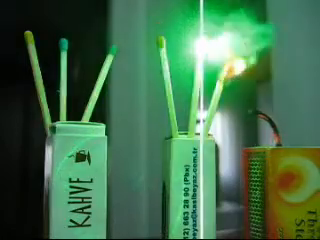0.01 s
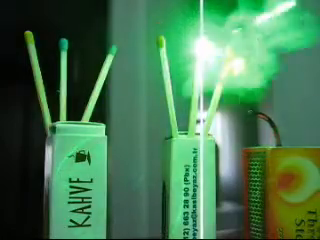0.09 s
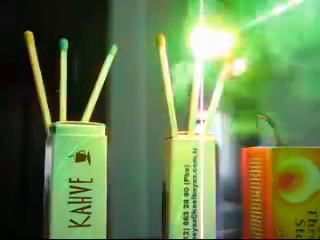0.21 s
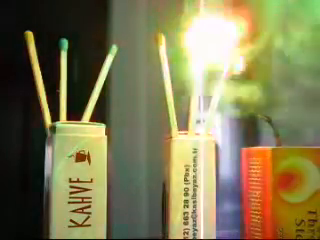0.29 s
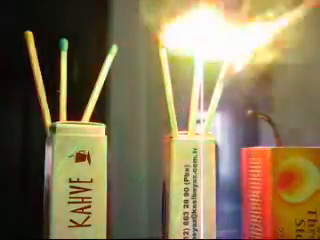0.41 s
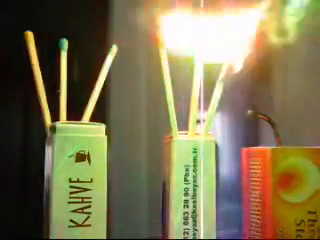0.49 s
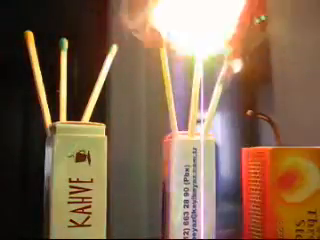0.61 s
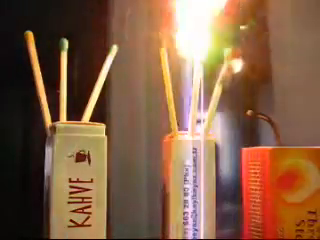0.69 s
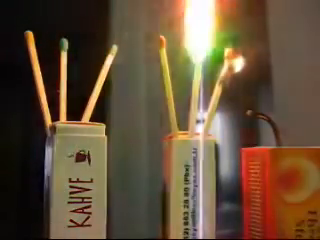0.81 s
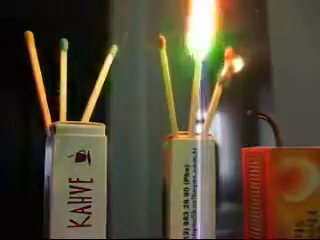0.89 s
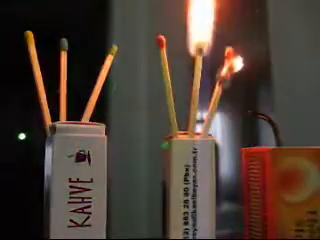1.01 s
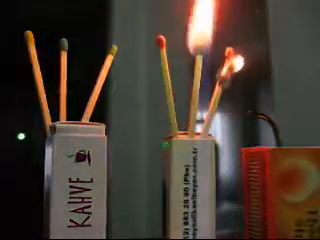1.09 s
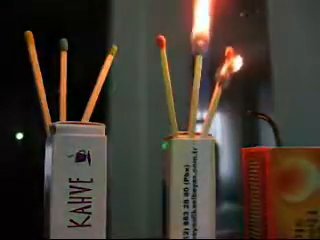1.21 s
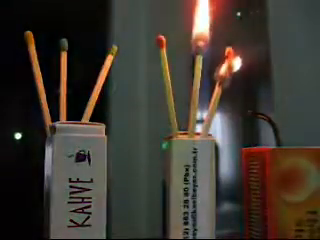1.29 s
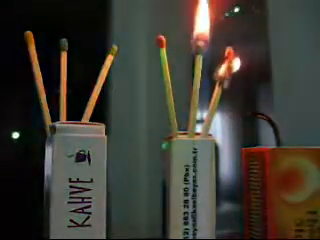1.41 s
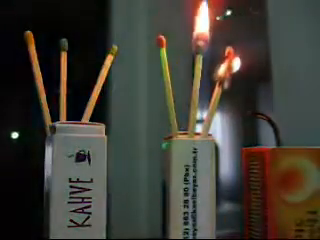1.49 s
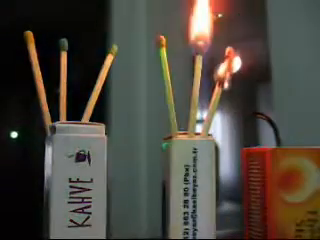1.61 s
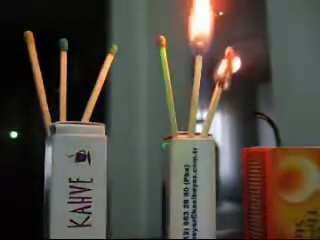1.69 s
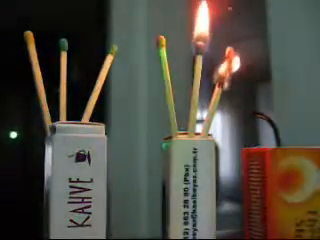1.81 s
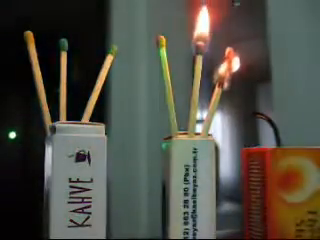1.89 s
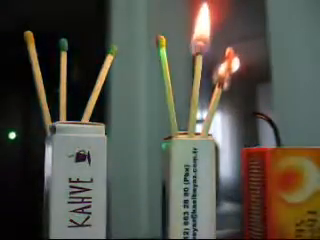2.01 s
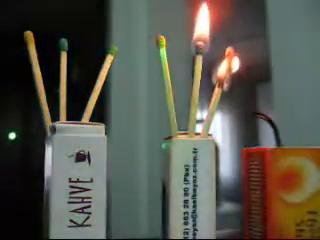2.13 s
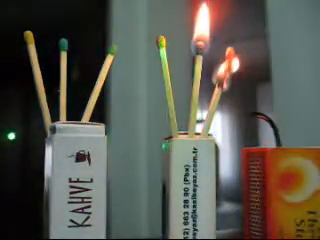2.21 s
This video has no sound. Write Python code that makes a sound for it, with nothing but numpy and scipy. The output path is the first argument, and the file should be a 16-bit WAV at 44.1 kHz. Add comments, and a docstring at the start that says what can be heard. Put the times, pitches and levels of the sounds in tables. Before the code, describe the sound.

A match head fizzes faintly, pops sharply and flares into a rough crackling hiss for under a second, then drops abruptly to a few woody ticks over low electrical hum, close microphone in a small room.

```python
"""A match head catches fire close to a microphone indoors: grain bursts and a gas jet, as shaped noise, fizz
softly, then flare for two thirds of a second and drop abruptly to a faint hiss. Decaying modes and a click
make one sharp pop as the flare starts; shaped clicks make the crackles and the burning stick's few ticks.
Low noise is the fluttering draught; wavering sines over room noise are the electrical hum and thin whine."""
import sys
import numpy as np
from scipy import signal
from scipy.fft import rfft, irfft, next_fast_len
from scipy.io import wavfile
from scipy.ndimage import map_coordinates

SR = 44100
rng = np.random.default_rng(int(sys.argv[2]) if len(sys.argv) > 2 else 0)


def store_pcm(level_fs):
    """Save levels as 16-bit WAV."""
    pcm = np.round(np.clip(level_fs, -1, 1) * 32767).astype(np.int16)
    wavfile.write(sys.argv[1], SR, np.atleast_2d(pcm).T)


N = 101430

TREBLE_HZ, TOP_HZ = 3460, 12750  # pivot of the treble tilts; band limit


def amp(db):
    """Decibels to gain."""
    return 10 ** (np.asarray(db) / 20)


def unit(x):
    """Scale to rms 1."""
    return x / np.sqrt(np.mean(x ** 2) + 1e-20)


def along(points, hz):
    """Interpolate (frequency [Hz], value) points on a log frequency axis."""
    point_hz, value = np.transpose(points)
    return np.interp(np.log(hz + 1), np.log(point_hz + 1), value)


def swell(rows):
    """Gain per sample from (time [s], level [dB]) rows, ends held."""
    time_s, level_db = np.transpose(rows)
    return amp(np.interp(np.arange(N) / SR, time_s, level_db))


def wobble(knots_per_s):
    """Smooth random curve: a spline through normal knots."""
    knots = rng.standard_normal(int(N * knots_per_s / SR) + 4)
    return map_coordinates(knots, [np.arange(N) * knots_per_s / SR])


def filtered(x, response):
    """Zero-phase filter: the spectrum of x times a gain of frequency."""
    size = next_fast_len(N + SR // 2)
    gain = response(np.fft.rfftfreq(size, 1 / SR))
    return irfft(rfft(x, size) * gain, size)[:N]


def noise(colour):
    """Gaussian noise of the given (frequency [Hz], level [dB]) colour, rms 1."""
    return unit(filtered(rng.standard_normal(N), lambda hz: amp(along(colour, hz))))


def snap(colour_db, size=2048):
    """Minimum-phase click of the given colour, peak 1, by folding the cepstrum."""
    magnitude = amp(colour_db(np.fft.rfftfreq(size, 1 / SR)))
    cepstrum = irfft(np.log(magnitude + 1e-6))
    cepstrum[1:size // 2] *= 2
    cepstrum[size // 2 + 1:] = 0
    click = irfft(np.exp(rfft(cepstrum)))
    return click / np.abs(click).max()


def add(track, start_s, sound):
    """Mix a sound into the track in place."""
    part = track[round(start_s * SR):][:len(sound)]
    part += sound[:len(part)]


def crumble(level_db, t60_s):
    """Unit impulse with fine bursts, as decaying noise, dying away after it."""
    t = np.arange(SR // 50) / SR
    bursts = amp(level_db - 60 * t / t60_s) * rng.standard_normal(len(t))
    return (t == 0) + bursts


def head_db(hz):
    """Colour of the burning head at the microphone, falling further above TOP_HZ."""
    # burning head: (frequency [Hz], level [dB])
    sizzle = [(60, -20.5), (200, -6), (480, 1.5), (630, -3.5), (800, 2), (1100, -3.5), (1400, 3),
              (1820, -3), (2300, 2.5), (2760, -5), (3200, 0), (4000, -6.5), (4450, -4.5), (5800, -5.5),
              (6700, -8.5), (7200, -11), (7900, -7), (8300, -12.5), (8750, -9), (9250, -16.5),
              (9600, -16.5), (10000, -18), (10800, -37)]
    return along(sizzle, hz) - 20 * np.clip(hz / TOP_HZ - 1, 0, 1)


def room(x, wet_db):
    """Add a small room's short answer: convolution with decaying noise of unit energy."""
    t60_s, onset_s = 0.36, 0.0011
    t = np.arange(SR // 4) / SR
    tail = rng.standard_normal(len(t)) * amp(-60 * t / t60_s) * (1 - np.exp(-t / onset_s))
    wet = signal.fftconvolve(x, tail / np.linalg.norm(tail))[:N]
    return x + amp(wet_db) * wet


def hum():
    """Appliance hum and whine: sines wavering in pitch and level over coloured room noise."""
    # room noise: (frequency [Hz], level [dB])
    floor_colour = [(10, -3.5), (32, -1), (50, -5), (65, -2), (82, -7.5), (105, -2.5), (135, -7), (250, -6),
                    (330, -12.5), (600, -16), (1000, -18.5), (1900, -23), (2900, -20.5), (4000, -24.5),
                    (7000, -29), (8500, -31.5), (9500, -36.5), (10800, -37.5)]
    # electrical hum and whine: (frequency [Hz], rms level [dB])
    partials = [(196.4, -43), (393, -54), (589, -64.5), (2774, -55), (3146, -63.5), (7880, -68.5),
                (8253, -63.5), (10829, -71.5)]
    floor_db, drift_hz, waver_db = -41, .4, .3
    out = amp(floor_db) * noise(floor_colour)
    for hz, level_db in partials:
        turns = np.cumsum(hz + drift_hz * wobble(10.6)) / SR + rng.random()
        gain = amp(level_db + waver_db * wobble(10.2))
        out += np.sqrt(2) * gain * np.sin(2 * np.pi * turns)
    return out


def draught():
    """Air moved by the flame flutters on the microphone: low noise under a level curve."""
    # air colour: (frequency [Hz], level [dB])
    air_colour = [(8, -1.5), (20, -10), (35, 1), (60, -3), (85, -12), (180, -19.5), (500, -80),
                  (2000, -100)]
    # air against the microphone: (time [s], level [dB])
    air_level = [(.2, -60), (.33, -43), (.4, -29), (.6, -32.5), (.69, -35), (.77, -30), (.9, -38),
                 (.96, -49), (1.15, -45), (1.24, -34.5), (1.38, -56), (1.64, -50), (1.74, -38), (1.85, -43),
                 (1.92, -69.5)]
    return noise(air_colour) * swell(air_level)


def ticks():
    """Soft ticks of the burning stick: clicks of one colour, each with its own treble tilt."""
    # stick ticks: (time [s], level [dB], tilt reached at TREBLE_HZ [dB])
    tick_rows = [(.8610, -20, -7), (0.938, -27.5, 10), (1.0743, -17.5, 7), (1.3639, -27.5, -15),
                 (1.9125, -31, -5), (2.131, -26, -10), (2.2805, -34, 5)]
    # tick colour before the tilt: (frequency [Hz], level [dB])
    tick_colour = [(40, 8), (130, 2), (250, 5), (480, 12), (780, 4.5), (1100, -4), (1600, -0.5),
                   (3000, -21.5), (8000, -18), (10800, -24)]
    crumble_db, t60_s = -24.5, 0.033
    out = np.zeros(N)
    for start_s, level_db, tilt_db in tick_rows:
        click = snap(lambda hz: along(tick_colour, hz) + tilt_db * np.clip(hz / TREBLE_HZ, 0, 1))
        add(out, start_s, -amp(level_db) * np.convolve(crumble(crumble_db, t60_s), click))
    return out


def crackles():
    """Larger grains burst singly: head-coloured clicks focused on a centre, crumbling for milliseconds."""
    # crackles of head and stick: (time [s], level [dB], centre [Hz], t60 of the crumbling [s])
    crackle_rows = [(0.1164, -22, 5500, .003), (0.2248, -27, 2550, .005), (0.3204, -10.5, 4100, .003),
                    (0.3784, -15, 5060, .004), (.3851, -5, 5000, .003), (0.4643, -12, 5000, .006),
                    (0.495, -11.5, 2980, .003), (.5469, -7.5, 4430, 0.013), (0.6431, -5.5, 4800, 0.0017),
                    (0.681, -14, 4500, .003), (.8413, -12, 3500, 0.0036), (0.8737, -15, 2620, 0.0061),
                    (0.8844, -11.5, 2840, 0.0094), (.9552, -31, 3000, 0.0026), (1.9606, -18, 4060, 0.0053)]
    width_octaves, skirt_db, crumble_db = 1.9, -12, -19
    out = np.zeros(N)
    for start_s, level_db, centre_hz, t60_s in crackle_rows:
        def colour_db(hz):
            octaves = np.log2((hz + 1) / centre_hz)
            focus = 1 / (1 + (octaves / width_octaves * 2) ** 4)
            return head_db(hz) + skirt_db * (1 - focus)
        burst = np.convolve(crumble(crumble_db, t60_s), snap(colour_db))
        add(out, start_s, amp(level_db) * burst)
    return out


def pop():
    """Trapped gas bursts out: a blow of a few ms as decaying modes, and the splitting head's click."""
    # modes of the burst: (frequency [Hz], level [dB], t60 [s])
    modes = [(210, -29, 0.011), (517, 0, 0.0063), (880, -2.5, 0.0048), (1420, -10.5, 0.0055),
             (2275, -0.5, 0.0056), (3036, -0.5, 0.004), (3870, -19, 0.0044), (4170, -22, 0.0045),
             (7760, -13, 0.0076), (8500, -10, 0.0046)]
    pop_s, pop_db, attack_s = .2139, 2.5, 0.00025
    split_delay_s, split_db, low_cut_hz = .0006, 2.5, 109
    out = np.zeros(N)
    t = np.arange(SR // 20) / SR
    ring = sum(amp(db - 60 * t / t60_s) * np.sin(2 * np.pi * hz * t) for hz, db, t60_s in modes)
    add(out, pop_s, -amp(pop_db) * ring * (1 - np.exp(-t / attack_s)))
    add(out, pop_s + split_delay_s, amp(split_db) * snap(head_db))
    return signal.sosfilt(signal.butter(2, low_cut_hz, "high", fs=SR, output="sos"), out)


def flare():
    """Thousands of tiny bursts and a smooth gas jet, coloured by the head, make the sputtering hiss."""
    # hiss before treble gain and sputter: (time [s], level [dB])
    hiss_level = [(.055, -72), (.072, -43), (.118, -41), (.143, -42), (.19, -39), (.209, -44), (.219, -27),
                  (.27, -26.5), (.39, -25.5), (.55, -27), (.635, -27.5), (.66, -32), (.69, -28), (.8, -30),
                  (.887, -33), (.905, -47), (.96, -51), (1.02, -57.5)]
    # gain of the hiss above TREBLE_HZ: (time [s], level [dB])
    treble_level = [(.07, 1), (.2, -1), (.25, -2), (.33, -1), (.4, 1), (.62, 1.5), (.68, 0), (.78, -1.5),
                    (.87, 3.5), (.95, -3)]
    grains_per_s, grain_spread_db, gas_db = 3000, 3, -4  # gas relative to grains
    sputter_db, sputter_knots_per_s = 0.48, 110
    sizes = amp(grain_spread_db * np.minimum(rng.exponential(size=N), 4)) * rng.choice([-1, 1], N)
    grains = unit(sizes * (rng.random(N) < grains_per_s / SR))
    source = grains + amp(gas_db) * rng.standard_normal(N)
    hiss = unit(signal.fftconvolve(source, snap(head_db))[:N])
    body = filtered(hiss, lambda hz: 1 / (1 + (hz / TREBLE_HZ) ** 4))
    tilted = body + (hiss - body) * swell(treble_level)
    sputter = amp(sputter_db * wobble(sputter_knots_per_s))
    return tilted * swell(hiss_level) * sputter


def scene():
    """The match in its room; wet levels in dB."""
    background = hum() + draught()
    bursts = room(pop() + crackles(), -26)
    stick = room(ticks(), -5)
    return (background + bursts + stick + flare())[None]


def record(dry):
    """Microphone overload clips the peaks; a half-rate converter mirrors the top treble up to TOP_HZ."""
    clip_top, converter_hz = 0.96, 10850
    clipped = np.clip(dry[0], -clip_top, clip_top)
    sound = filtered(clipped, lambda hz: 1 / (1 + (hz / converter_hz) ** 200))
    sampled = 2 * sound * (np.arange(N) % 2)  # zeroing alternate samples mirrors about SR / 4
    return filtered(sampled, lambda hz: 1 / (1 + (hz / TOP_HZ) ** 300))[None]


dry = scene()
out = record(dry)
store_pcm(out)
```